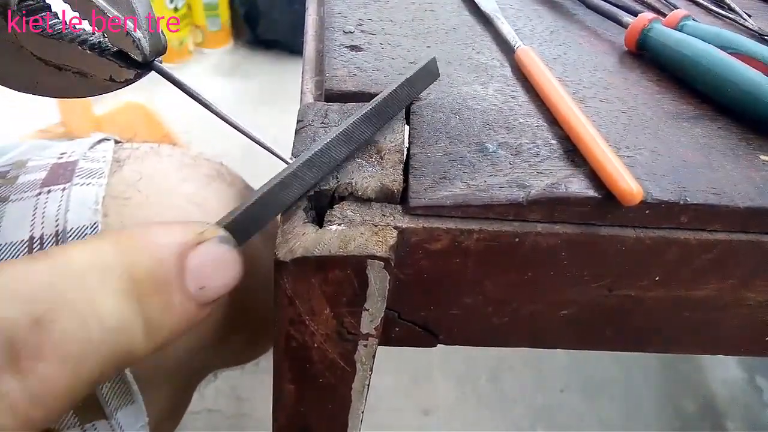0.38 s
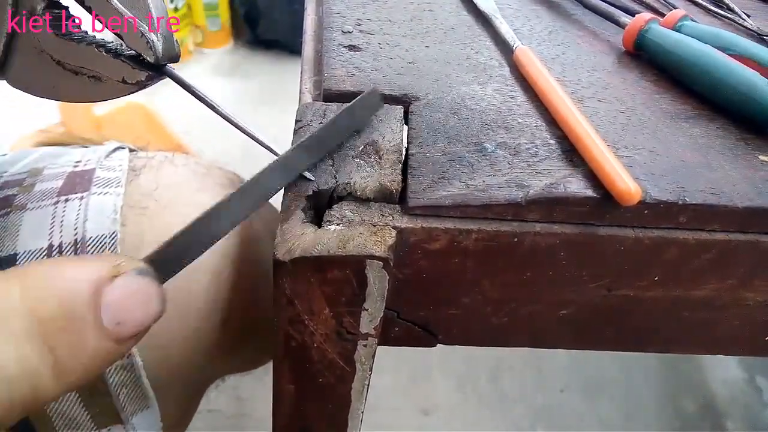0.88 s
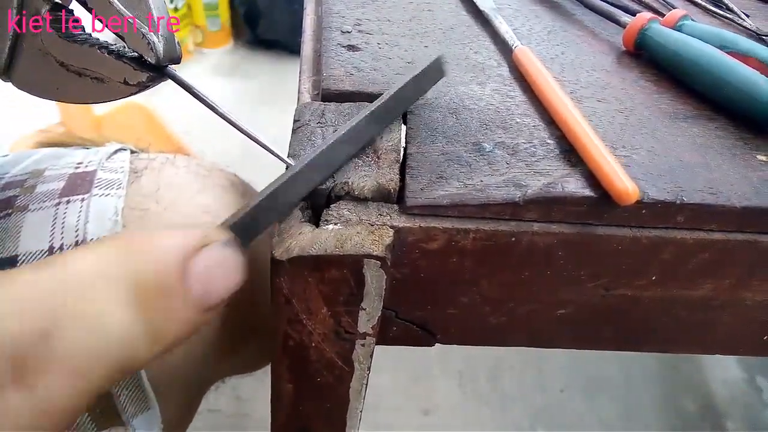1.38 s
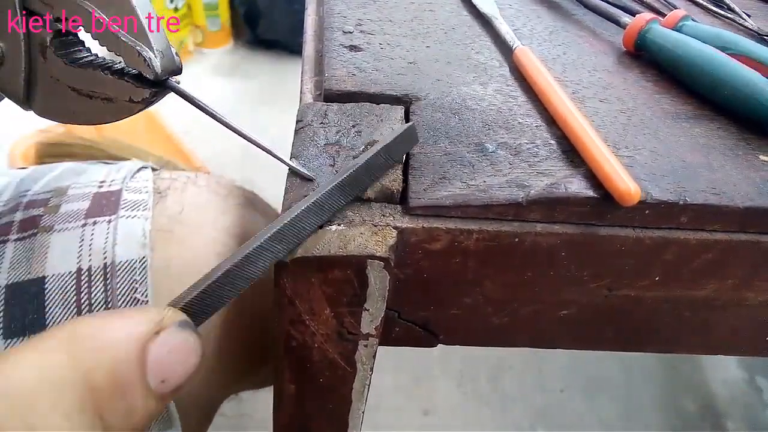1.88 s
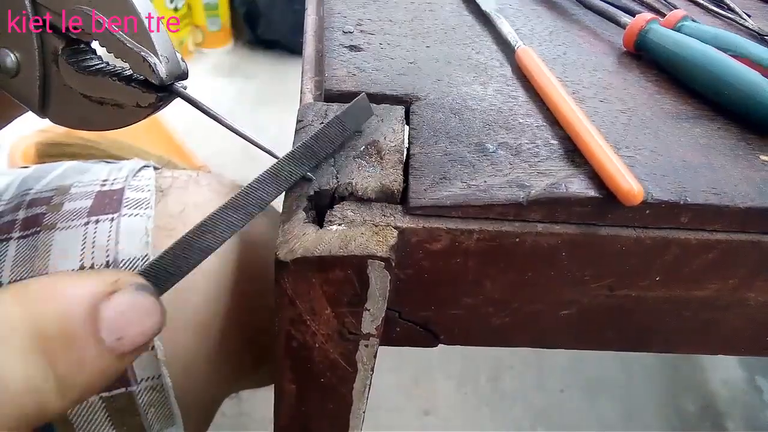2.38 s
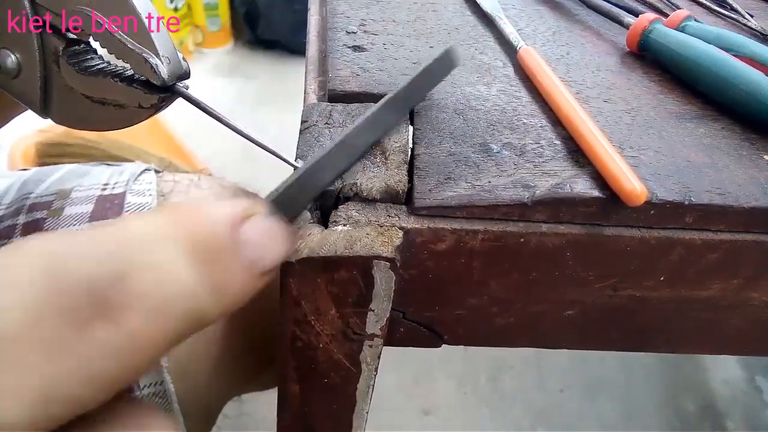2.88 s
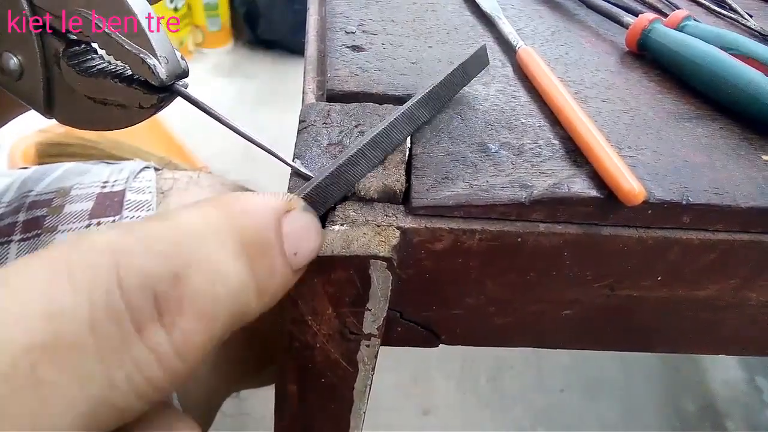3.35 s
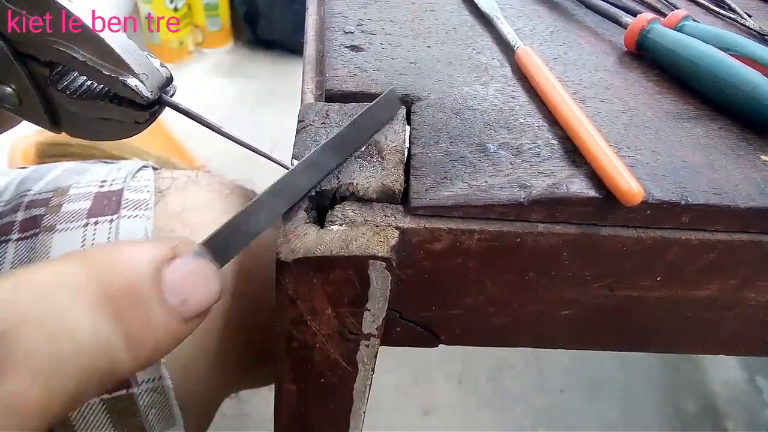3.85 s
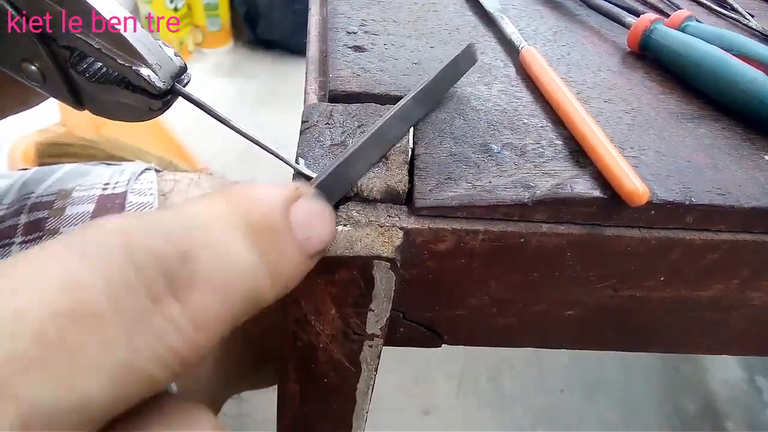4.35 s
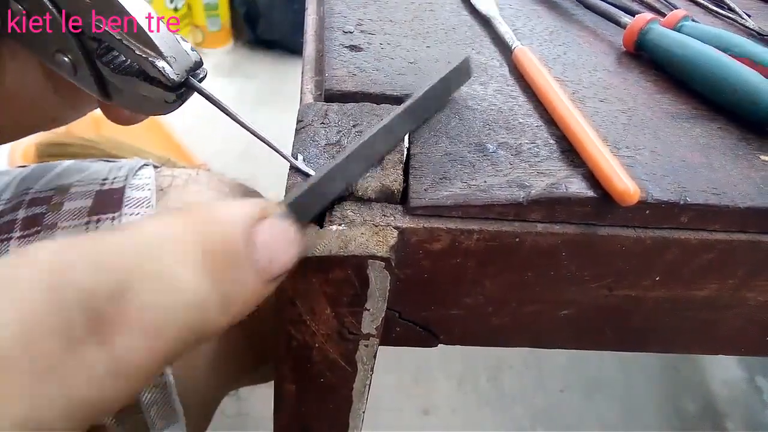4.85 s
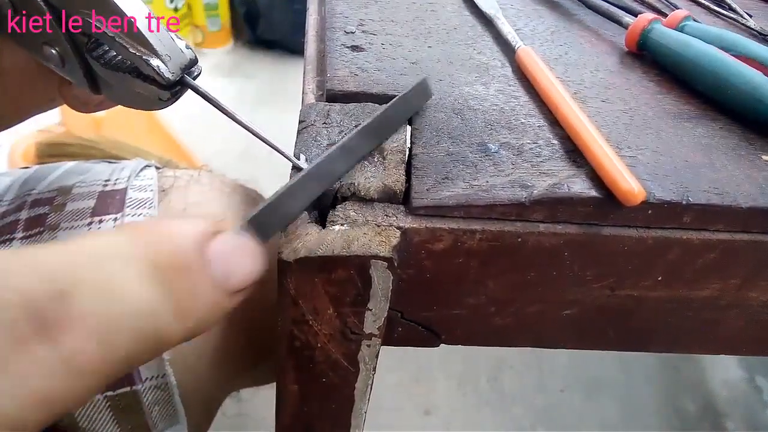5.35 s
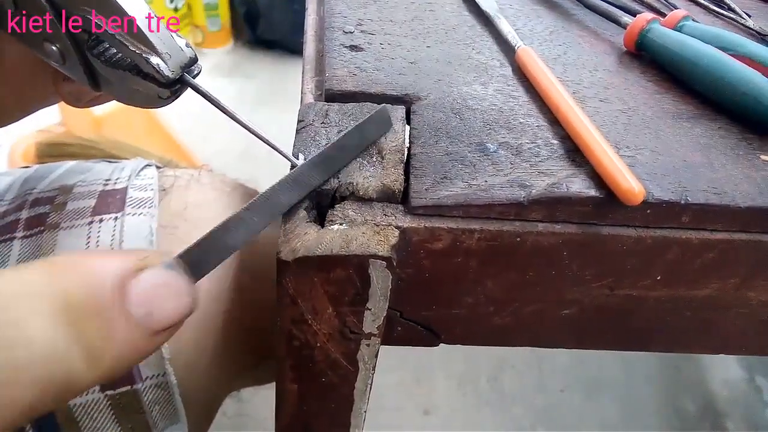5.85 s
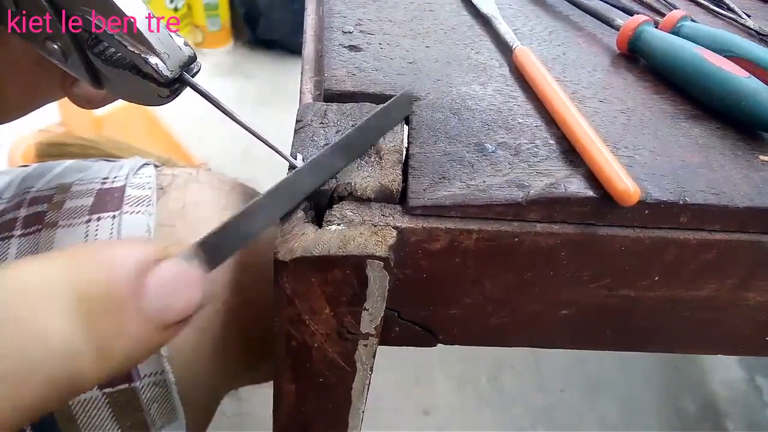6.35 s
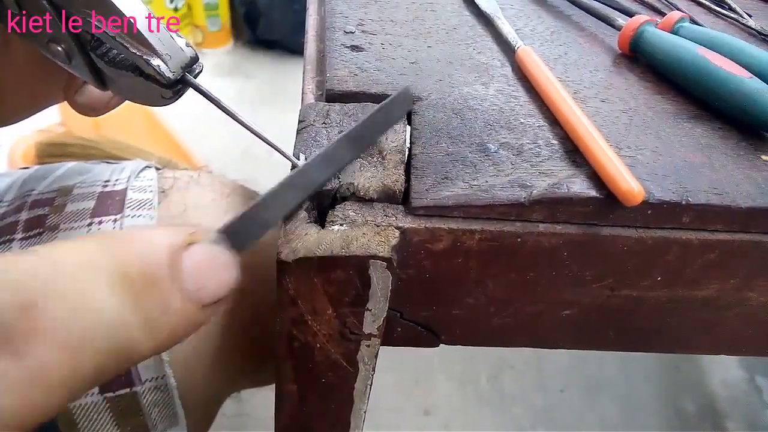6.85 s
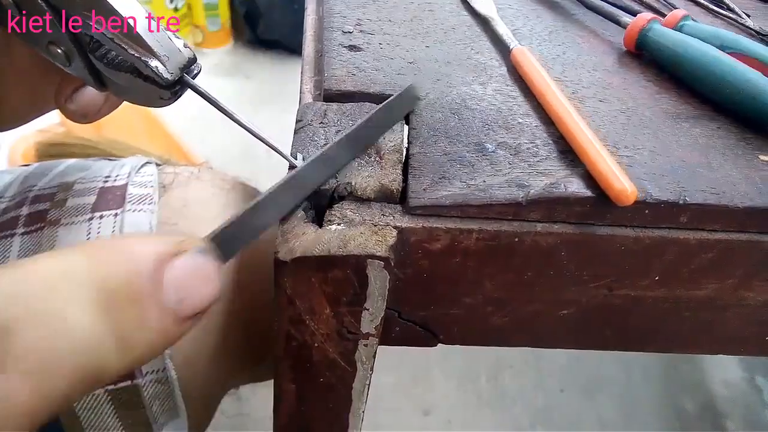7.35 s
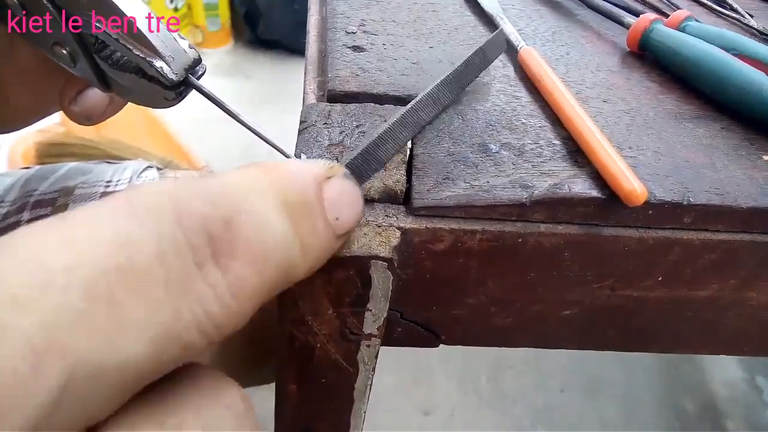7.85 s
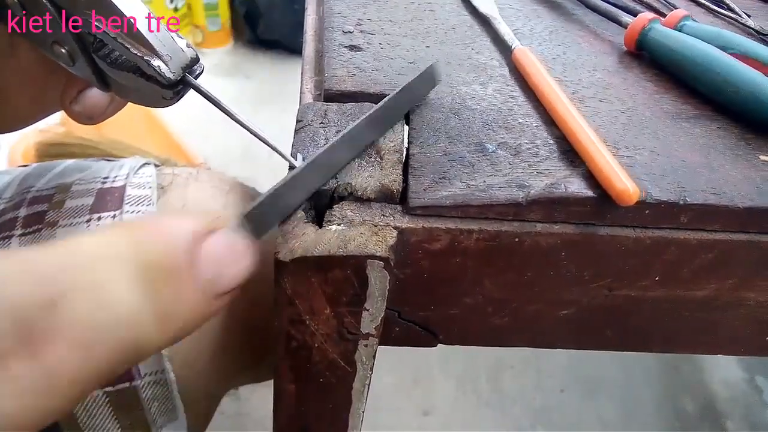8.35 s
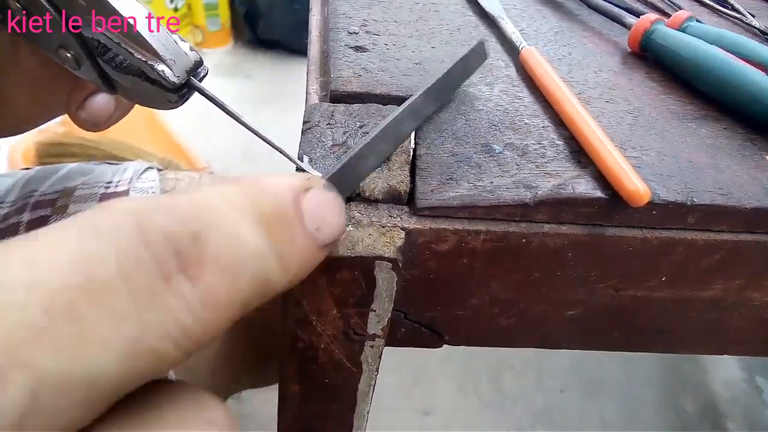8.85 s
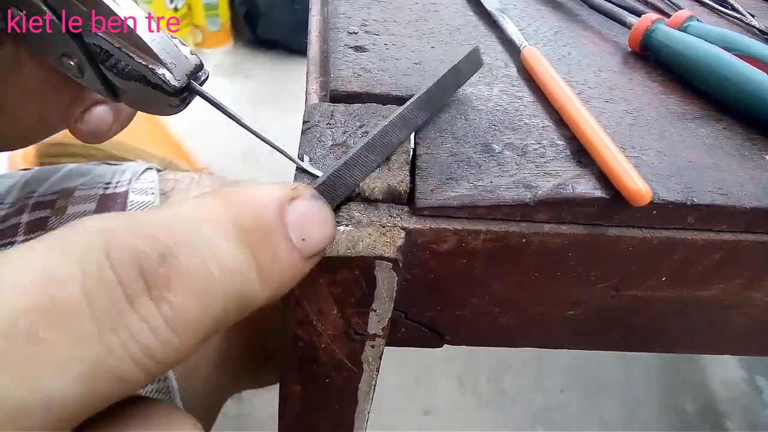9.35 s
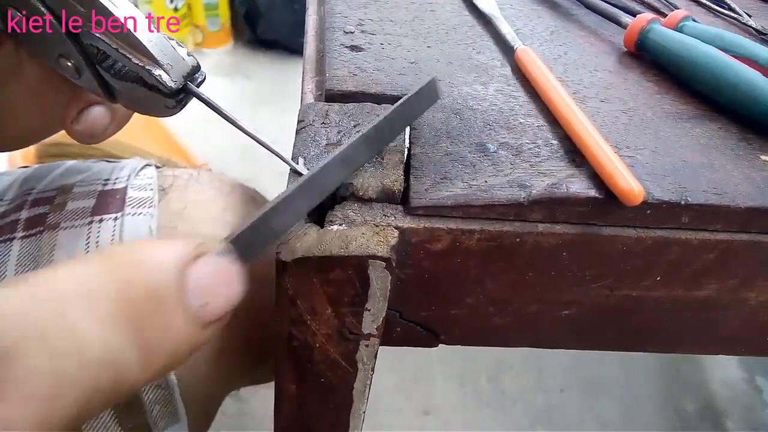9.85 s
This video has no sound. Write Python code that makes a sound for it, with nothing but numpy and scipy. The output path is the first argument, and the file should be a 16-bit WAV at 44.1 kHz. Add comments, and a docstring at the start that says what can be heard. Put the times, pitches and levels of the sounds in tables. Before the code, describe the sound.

In a quiet room with soft air noise and a faint wavering low hum, a small steel file works on a thin metal hook very close to a phone microphone. From 0 to 1 s the strokes are quick, light and ringing, pushes alternating with softer returns. They become firmer, with a tap at 1.2 s and harsh, gritty bites near 1.9 s. From about 2.4 to 5 s slower, separate strokes scrape brightly, with landing clicks between them, a hard bite at 3.2 s and a sharp tap at 4.1 s. A strong tap comes at 5.3 s, then brisk back-and-forth rasping continues to the end, with clear knocks near 7.1, 8.4 and 9.5 s and crackling bites around 8.8 and 9.6 s. Short room echoes follow. Faint, distant bird whistles appear near 2.1, 3.7, 4.7 and 7 s.

```python
"""A quiet room with a wavering hum: steady coloured noise and narrow resonances fed by noise.
From the start, close to a phone microphone, a small flat steel file is pushed and drawn back over a
fishing hook: uneven random clicks of its teeth ring the file, the hook and the bench, with a short echo.
From 1.2 s the file taps as it lands, short blows with a bounce; from 1.9 s some teeth bite hard in mid stroke.
From 2.1 s a far bird whistles now and then, a gliding sine tone with its octave."""
import sys
import numpy as np
from scipy import signal
from scipy.io import wavfile
from scipy.ndimage import uniform_filter1d

SR = 44100
rng = np.random.default_rng(int(sys.argv[2]) if len(sys.argv) > 2 else 0)


def gain_from_db(level_db):
    """Convert decibel levels to linear amplitude factors (20 dB per decade)."""
    decades = np.asarray(level_db, float) / 20
    return 10 ** decades


def master(y):
    """Save y as 16-bit WAV."""
    cut = np.clip(np.atleast_2d(y).T, -1, 1)
    pcm = np.round(cut * 32767)  # scale
    wavfile.write(sys.argv[1], SR, pcm.astype(np.int16))


N = 439677  # length in samples

# colour of the room's air noise: f/Hz, relative level per Hz/dB
AIR_COLOUR = [(15, -47), (25, -36.5), (75, -9.5), (125, -3.5), (383, -13.5), (438, -9.5), (709, -14.5),
              (952, -15.5), (1030, -15), (2300, -19), (3090, -22.5), (3350, -13.5), (6720, -27),
              (8320, -74.5), (15000, -67.5)]
AIR_DB = -48  # rms
# wavering hum: f/Hz, width of each of two resonances in a row/Hz, rms level/dB
HUM_TONES = [(100.5, 6.7, -57), (288.9, 17.7, -58.5)]
# pushes of the file: t of most pressure/s, swell/s, ease/s, pressure/dB, file note against it/dB
PUSH_STROKES = [(0.142, 0.06, 0.018, -23.5, -16.5), (0.372, 0.019, 0.061, -23.5, -14),
                (0.674, 0.062, 0.019, -22.5, -14.5), (0.962, 0.082, 0.0044, -16.5, -17.5),
                (1.322, 0.0044, 0.059, -14.5, -10), (1.614, 0.032, 0.036, -11, -8),
                (1.876, 0.017, 0.061, -9.5, -10), (2.528, 0.066, 0.023, -12.5, -21),
                (2.816, 0.061, 0.037, -11, -23.5), (3.212, 0.047, 0.045, -10, -25.5),
                (3.616, 0.058, 0.027, -13.5, -27), (4.256, 0.066, 0.057, -18.5, -17),
                (4.616, 0.03, 0.082, -15.5, -11.5), (5.028, 0.048, 0.04, -14.5, -15.4),
                (5.412, 0.042, 0.029, -18, -27), (5.663, 0.011, 0.067, -19.5, -7),
                (5.995, 0.068, 0, -17.0, -10.5), (6.241, 0.036, 0.042, -14.5, -14),
                (6.561, 0.079, 0, -14.5, -14.5), (6.843, 0.071, 0.011, -12.5, -17.5),
                (7.21, 0.018, 0.058, -18.5, -13), (7.485, 0.0026, 0.05, -12.5, -6),
                (7.805, 0.044, 0.031, -16.5, -15), (8.091, 0.048, 0.048, -15.5, -19),
                (8.532, 0.034, 0.038, -19.5, -21.5), (8.847, 0.055, 0.015, -14, -18.5),
                (9.189, 0.11, 0.009, -16.5, -19.5), (9.672, 0.079, 0.0095, -14, -20),
                (9.966, 0.024, 0.042, -23, -14.7)]
# lighter returns: t of most pressure/s, swell/s, ease/s, pressure/dB, file note against it/dB
PULL_STROKES = [(0.004, 0.01, 0.027, -29, -19), (0.281, 0.077, 0.0061, -27.5, -19),
                (0.512, 0.03, 0.037, -27, -20), (0.79, 0.064, 0.032, -28.5, -22),
                (1.464, 0.033, 0.045, -22.5, -14.5), (1.758, 0.048, 0.038, -21, -24),
                (2.014, 0.037, 0.04, -30.5, -31), (2.634, 0.027, 0.06, -24.2, -19.5),
                (3.684, 0.0037, 0.17, -49.5, -25), (5.104, 0.004, 0.02, -33.5, -18.2),
                (5.5, 0.0089, 0.09, -25, -10), (5.812, 0.029, 0.05, -27, -13),
                (6.096, 0.039, 0.055, -24.5, -13), (6.4, 0.067, 0.018, -22.5, -15),
                (6.673, 0.052, 0.025, -21, -11), (7.374, 0.047, 0.044, -25, -10),
                (7.674, 0.06, 0.018, -23.5, -11), (7.93, 0.04, 0.057, -24.5, -16.5),
                (8.668, 0.034, 0.052, -24.5, -12.5), (8.978, 0.062, 0.051, -22.5, -14),
                (9.704, 0.004, 0.13, -35.5, -31)]
# every stroke: the teeth grip quickly up to a shoulder, swell to the top, ease to a shoulder and let go
GRIP_DB_PER_S, SWELL_DB, EASE_DB, LET_GO_DB_PER_S = 606.5, 6, 7.5, 799
EDGE_S = 0.042  # the file is already moving this long before and after the shoulders
# the teeth first catch this long before the shoulder, with a jolt; under LIGHT_DB the touch is light
CATCH_S, CATCH_DB_PER_S, LIGHT_DB = .024, 2497, -28
# a file that landed less than this long ago does not jolt but creeps into the stroke
LANDED_S, CREEP_DB_PER_S = .11, 430
# how the pliers and fingers hold and damp the steel: t/s, hook ring level/dB,
# lower file modes/dB (in full at 3500 to 4050 Hz, 0.4 of it below), treble/dB, file bending/dB, bench/dB
HOLD = [(.1, -7, -12.5, -19.5, -16, -21.5), (0.898, -7, -17, -9, -15, -18),
        (1.399, -15.5, -1.5, 6, -14, -22.5), (1.899, -17, 0.5, 6.5, -22, -23.5),
        (2.5, -34, 9, 0, -14.5, -20), (3.2, -19.5, 8, 6, -13.5, -20.5), (3.6, -32, 9.5, -6, -31, -14.5),
        (4.25, -14.5, -0.5, -12.5, -21, -22.5), (5.05, -16, -2, -11.5, -16, -18),
        (5.4, -20, -1, -5, -19, -21.5), (6.4, -14.5, -2.5, -3, -19, -21),
        (7.201, -14.5, -2, -5, -18, -19.5), (8.1, -28.5, -1, -2, -20, -18.5),
        (8.9, -12.5, -2, -8, -14.5, -19.5), (9.6, -24.5, 2, 5.5, -24.5, -16.5)]
# rings with their own share, rows file note, file bending, bench and hook: f/Hz, width/Hz
OWN_RINGS = [(1598.4, 27), (906.3, 40), (458, 258), (2554, 27)]
# higher modes of the file, always rung: f/Hz, width/Hz, relative level/dB
FILE_MODES = [(3333, 26, -7), (3810, 44, -16.5), (3976, 80, -2), (3920, 42, -21), (4600, 180, -20.5),
              (4554, 206, 2), (4790, 190, -5.5), (4695, 48, -4), (5096, 35, -1.5), (5160, 96, -6),
              (5530, 65, -27.5), (5860, 15, -14.5), (6493, 41, -12), (6850, 38, -28), (7420, 92, -23.5),
              (7280, 29, -25), (7900, 43, -32), (8430, 47, -37), (10800, 66, -56)]
# scrape between the modes, as the microphone colours it: f/Hz, relative level per Hz/dB
SCRAPE_COLOUR = [(150, -48), (300, -37), (650, -12), (900, -10.5), (1300, -10), (2000, -13.5), (2700, -6.5),
                 (3200, -9.5), (4000, -4), (4700, 7.5), (5500, -13), (7000, -31), (9500, -63.5),
                 (13500, -73), (15400, -48.5)]
# change from tip to handle, rows file note, bending, bench, hook and low rasp: level against pressure/dB
ALONG_FILE_DB = [-35, -1.5, 19, -16.8, 1.5]
# what each of these five loses against pressure for every dB pressed above MID_DB: loss/dB
PRESSED_LOSS = [0.14, 0.2, 0.75, 0.12, 0.49]
MID_DB, RASP_DB = -22, -8.5
# the free end of the file grows on a push, so its ring falls: from f/Hz, to f/Hz, level over the file note/dB
PUSH_GLIDE = (1950, 1400, 5)
# on the return the ring rises: from f/Hz, to f/Hz, level over the file note/dB
PULL_GLIDE = (1130, 1750, 1.5)
# the contact point wanders, so the rings drift in pitch (rms share) and strength (rms dB) over some ms
DRIFT, DRIFT_DB, DRIFT_MS = 0.012, 1.5, 26.4
# the echo: f/Hz, time to fall 60 dB/s
WALL_DECAY = [(300, 0.66), (1500, 0.4), (4500, 0.33), (9000, 0.28)]
# the file lands on the hook or knocks it: t/s, peak level of the high part/dB, low part against it/dB
LANDINGS = [(1.213, -13, -12), (2.3901, -18.5, -11), (3.097, -17.5, -1.5), (3.4899, -25, -6),
            (3.815, -30, -26), (3.973, -36, -8), (4.106, -9, -15), (4.9095, -13, -14), (5.2993, -4.5, -29),
            (5.439, -14, -19), (7.0887, -8, -27), (8.3976, -6.5, -22), (9.517, -5.5, -19),
            (9.8166, -35, -19), (9.9075, -12.5, -13)]
# teeth that bite hard in mid stroke: t/s, peak level/dB
HARD_BITES = [(1.8575, -2), (1.8762, -7), (1.885, -5), (1.905, -1), (1.914, -3), (3.2166, 1), (5.407, -6),
              (6.8335, -3), (7.4904, -3), (8.8227, 0), (8.844, 1.5), (9.179, -12), (9.187, -16),
              (9.191, -15.5), (9.6339, -4), (9.6458, -10), (9.6693, -4.5)]
# far whistles: start t/s, length/s, from f/Hz, to f/Hz, fundamental rms level/dB, octave rms level/dB
WHISTLES = [(2.14, .2, 965, 950, -62, -76), (3.72, .15, 1005, 1025, -68, -57),
            (4.7, .22, 1015, 980, -58, -62), (6.99, .2, 1045, 960, -58, -51)]


def evened(x):
    """Scales to rms 1."""
    return x / np.sqrt(np.mean(x ** 2) + 1e-20)


def read(points, hz):
    """Reads a spectrum on a log frequency axis."""
    f, value = np.transpose(points)
    return np.interp(np.log(hz + 1), np.log(f + 1), value)


def add(mix, s, sound):
    """Mixes a sound in at a time in s."""
    part = mix[round(s * SR):][:len(sound)]
    part += sound[:len(part)]


def band(x, kind, hz):
    """Steep low-pass or high-pass."""
    return signal.sosfilt(signal.butter(4, hz, kind, fs=SR, output="sos"), x)


def resonate(x, hz, width):
    """A two-pole resonance of gain 1."""
    return signal.lfilter(*signal.iirpeak(hz, hz / width, SR), x)


def colour(x, points):
    """Minimum-phase filter with the given spectrum."""
    gain_db = read(points, abs(np.fft.fftfreq(4096, 1 / SR)))
    log_gain = np.log(gain_from_db(np.maximum(gain_db, -100)))
    taps = np.fft.ifft(np.exp(np.conj(signal.hilbert(log_gain)))).real[:2048]
    return signal.oaconvolve(x, taps)[:len(x)]


def wander(ms):
    """Slow random curve of rms 1: noise averaged twice over the given span."""
    span = round(ms * SR / 1000)
    once = uniform_filter1d(rng.standard_normal(N), span)
    return evened(uniform_filter1d(once, span))


def drifting(x, hz, width):
    """A resonance that follows a pitch curve: shifted down to 0 Hz, smoothed and shifted back."""
    turn = np.exp(2j * np.pi * np.cumsum(hz) / SR)
    r = np.exp(-np.pi * width / SR)
    return (turn * signal.lfilter([1 - r], [1, -r], x / turn)).real


def room():
    """Steady air noise, and a hum that wavers because noise feeds its narrow resonances."""
    out = gain_from_db(AIR_DB) * evened(colour(rng.standard_normal(N), AIR_COLOUR))
    noise = rng.standard_normal(N)
    for hz, width, db in HUM_TONES:
        out += gain_from_db(db) * evened(resonate(resonate(noise, hz, width), hz, width))
    return out


def hand():
    """Pressure, place of contact (0 tip, 1 handle) and feed of the file note; the firmest stroke wins."""
    pressure_db, place, note_db = np.full(N, -90.), np.zeros(N), np.zeros(N)
    for table, pushed in ((PUSH_STROKES, True), (PULL_STROKES, False)):
        for top, swell, ease, db, feed_db in table:
            swell, ease = max(swell, .002), max(ease, .002)
            first = max(round((top - swell - .12) * SR), 0)
            at = np.arange(first, min(round((top + ease + .1) * SR), N))
            t = at / SR - top
            level = db + np.interp(t, [-swell, 0, ease], [-SWELL_DB, 0, -EASE_DB])
            # how far the pressure still lies below the first shoulder
            early_db = GRIP_DB_PER_S * np.maximum(-swell - t, 0)
            early_db += CATCH_DB_PER_S * np.maximum(-swell - CATCH_S - t, 0)
            for landing, *_ in LANDINGS:
                if 0 < top - swell - landing < LANDED_S:
                    creep_db = CREEP_DB_PER_S * np.maximum(-swell - t, 0)
                    early_db = np.where(t + top > landing, creep_db, early_db)
            level -= early_db + LET_GO_DB_PER_S * np.maximum(t - ease, 0)
            along = np.clip((t + swell + EDGE_S) / (swell + ease + 2 * EDGE_S), 0, 1)
            wins = level > pressure_db[at]
            pressure_db[at[wins]], note_db[at[wins]] = level[wins], feed_db
            place[at[wins]] = (along if pushed else 1 - along)[wins]
    return pressure_db, place, note_db


def teeth(per_s, spread_db, chatter_db, chatter_ms):
    """Random catches of the teeth; the file chatters, so they come in lumps of a few ms."""
    size = gain_from_db(spread_db * np.minimum(rng.exponential(1, N), 4)) * rng.choice([-1., 1.], N)
    caught = rng.random(N) < per_s / SR
    return evened(size * caught * gain_from_db(chatter_db * wander(chatter_ms)))


def steel(drive, lower_db=0, treble_db=0):
    """The modes of the file, as resonances of alternating sign, and the high scrape between them."""
    modes = 0
    for k, (hz, width, db) in enumerate(FILE_MODES):
        held_db = lower_db * (hz < 4050) * (1 if hz > 3500 else .4)
        ring = resonate(drive * gain_from_db(held_db), hz, width)
        modes = modes + (-1) ** k * gain_from_db(db) / np.sqrt(width) * ring
    both = gain_from_db(17.5) * modes + band(colour(drive, SCRAPE_COLOUR), "high", 3770)
    return both + (gain_from_db(treble_db) - 1) * band(both, "high", 6500)


def slide(drive):
    """The ring of the free end: a resonance that glides through each half stroke."""
    out = np.zeros(N)
    width = 130  # Hz
    for table, (from_hz, to_hz, db) in ((PUSH_STROKES, PUSH_GLIDE), (PULL_STROKES, PULL_GLIDE)):
        for top, swell, ease, _, note_db in table:
            start = max(top - swell - EDGE_S, 0)
            x = drive[round(start * SR):round((top + ease + EDGE_S) * SR)]
            turn = np.exp(2j * np.pi * np.cumsum(np.geomspace(from_hz, to_hz, len(x))) / SR)
            ring = (turn * signal.lfilter(*signal.butter(2, width / 2, fs=SR), x / turn)).real
            gain = gain_from_db(db + note_db) * np.sqrt(SR / width)
            add(out, start, gain * ring * signal.windows.tukey(len(x), .3))
    return out


def strokes():
    """Pressure drives the teeth; where the file touches decides how much each ring is fed."""
    pressure_db, place, note_db = hand()
    s, *columns = np.transpose(HOLD)
    held = [np.interp(np.arange(N) / SR, s, column) for column in columns]
    hook_db, lower_db, treble_db, bend_db, bench_db = held
    pressed_db = np.maximum(pressure_db, LIGHT_DB) - MID_DB
    feeds = zip((note_db, bend_db, bench_db, hook_db, RASP_DB), ALONG_FILE_DB, PRESSED_LOSS)
    *shares_db, rasp_db = [db + slope_db * (place - .5) - loss * pressed_db for db, slope_db, loss in feeds]
    grain = teeth(per_s=6500, spread_db=2.5, chatter_db=1.5, chatter_ms=7.2)
    drive = grain * gain_from_db(pressure_db)
    # the bare grain sets the level of each part
    out = steel(drive, lower_db, treble_db) / np.std(steel(grain)) + slide(drive)
    rasp = band(colour(drive * gain_from_db(rasp_db), SCRAPE_COLOUR), "low", 2423)
    out += rasp / np.std(band(colour(grain, SCRAPE_COLOUR), "low", 2890))
    light_db = .4 * np.minimum(pressure_db - LIGHT_DB, 0)  # a light touch barely sets the rings going
    for (hz, width), share_db in zip(OWN_RINGS, shares_db):
        pitch = hz * (1 + DRIFT * wander(DRIFT_MS))
        fed_db = share_db + light_db + DRIFT_DB * wander(DRIFT_MS)
        ring = resonate(drifting(drive * gain_from_db(fed_db), pitch, width), hz, 10.0 * width)
        plain = resonate(drifting(grain, pitch, width), hz, 10.0 * width)
        out += ring / np.std(plain)
    return out


def walls(x):
    """Echo of the room: sparse taps of random sign, each band dying at its own speed."""
    taps = np.zeros(SR // 2)
    at = np.arange(200, len(taps) - 20, 20)
    taps[at + rng.integers(0, 20, len(at))] = rng.choice([-1., 1.], len(at))
    hz, t, z = signal.stft(taps, SR, nperseg=256)
    fading = z * gain_from_db(-60 * t / read(WALL_DECAY, hz)[:, None])
    tail = signal.istft(fading, SR, nperseg=256)[1]
    return signal.oaconvolve(x, tail / np.linalg.norm(tail))[:N]


def landings():
    """A landing is a noisy blow, a bounce 2.3 ms later and a faint tail, ringing the steel and lower parts."""
    out, t = np.zeros(N), np.arange(3000) / SR
    bounce = 0.7 * (t > .0023) * np.exp(-abs(t - .0023) / .0006)
    force = np.exp(-t / 0.00035) + bounce + 0.13 * np.exp(-t / 0.012)
    for s, db, low_db in LANDINGS:
        blow = band(rng.standard_normal(len(t)) * force, "low", 6700)
        high = steel(blow) + 2.0 * band(colour(blow, SCRAPE_COLOUR), "high", 1460)
        low = resonate(blow, 660, 270) + resonate(blow, 2400, 460)
        add(out, s, gain_from_db(db) * (high / abs(high).max() + gain_from_db(low_db) * low / abs(low).max()))
    return out


def bites():
    """A hard bite is a noise burst a few ms long through two resonances in a row."""
    out, t = np.zeros(N), np.arange(3000) / SR
    for s, db in HARD_BITES:
        catches = rng.standard_normal(len(t)) * t * np.exp(-t / 0.00065)
        burst = resonate(resonate(catches, 4000, 500), 5340, 730)
        add(out, s, gain_from_db(db) * burst / abs(burst).max())
    return out


def bird():
    """A thin whistle with its octave: sines on one gliding, wavering pitch."""
    out = np.zeros(N)
    for start, length, from_hz, to_hz, first_db, octave_db in WHISTLES:
        n = round(length * SR)
        waver = evened(uniform_filter1d(rng.standard_normal(SR // 2), 600))[:n]
        pitch = np.linspace(from_hz, to_hz, n) * (1 + .012 * waver)
        turn = 2 * np.pi * np.cumsum(pitch) / SR
        note = gain_from_db(first_db) * np.sin(turn) + gain_from_db(octave_db) * np.sin(2 * turn)
        add(out, start, np.sqrt(2) * note * signal.windows.tukey(n, .4))
    return out


def scene():
    """Close file and far bird with their echo over the room; one microphone feeds both channels."""
    near, far = strokes() + landings() + bites(), bird()
    echo = walls(gain_from_db(-13) * near + far)  # the close file sends less into the room
    return np.tile(near + far + echo + room(), (2, 1))


def roll_off(x):
    """The treble ends steeply here."""
    return signal.sosfilt(signal.butter(12, 15690, fs=SR, output="sos"), x)


def record(dry):
    """The loudest peaks hit the top of the converter and are cut flat."""
    return roll_off(np.clip(dry, -.97, .97))


dry = scene()
out = record(dry)
master(out)
```